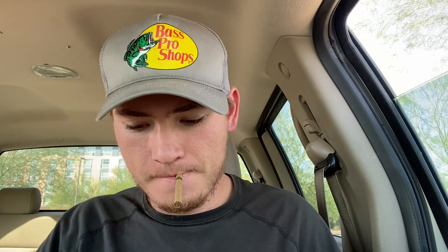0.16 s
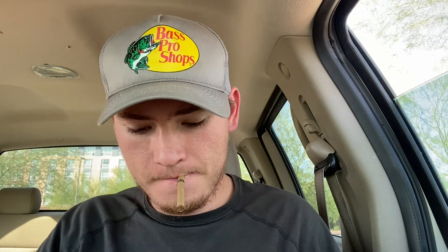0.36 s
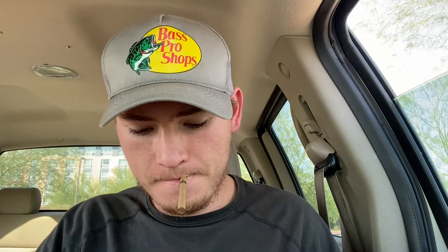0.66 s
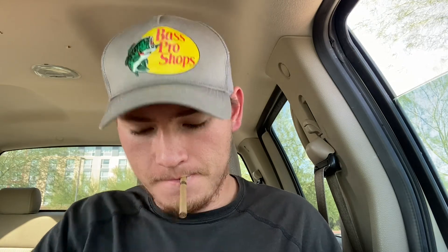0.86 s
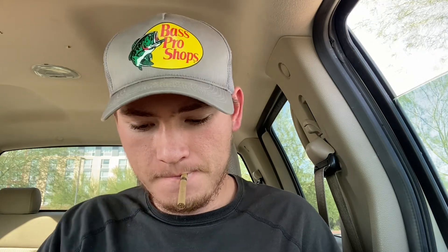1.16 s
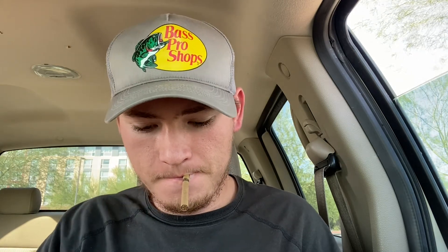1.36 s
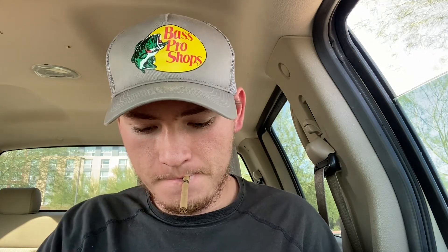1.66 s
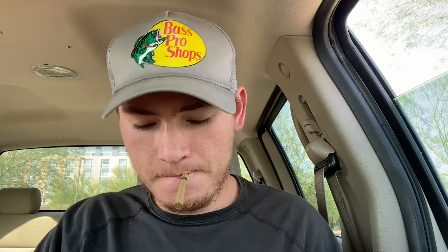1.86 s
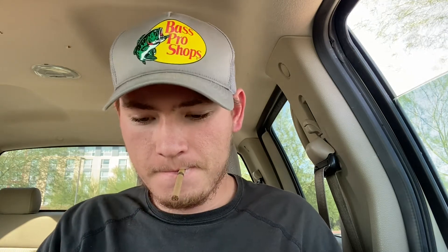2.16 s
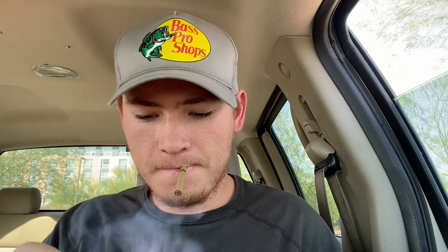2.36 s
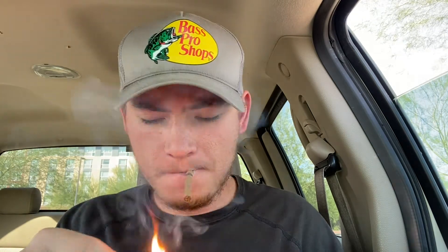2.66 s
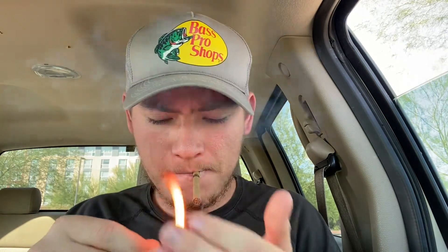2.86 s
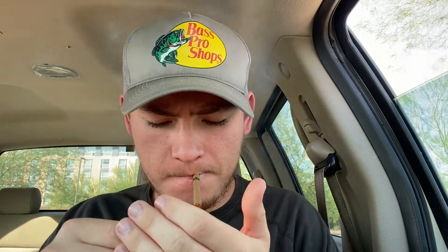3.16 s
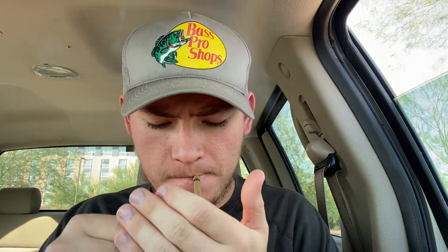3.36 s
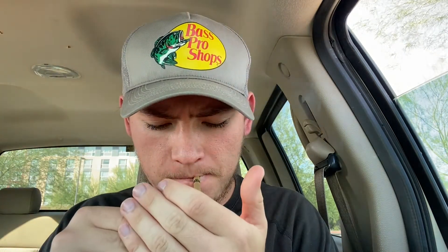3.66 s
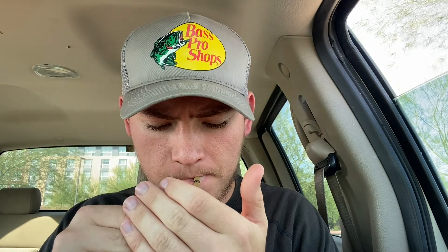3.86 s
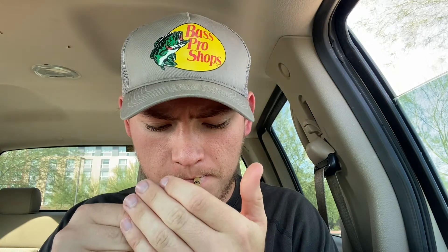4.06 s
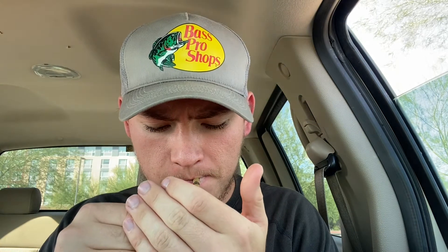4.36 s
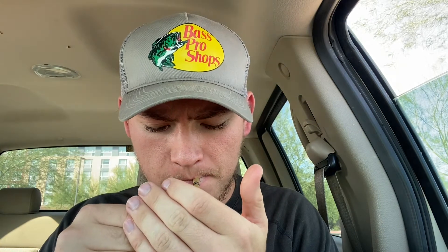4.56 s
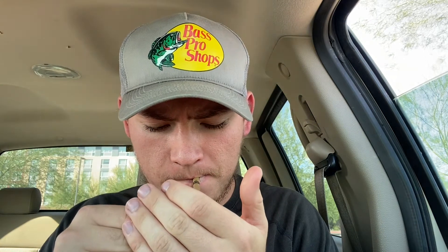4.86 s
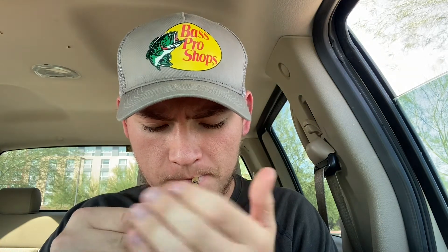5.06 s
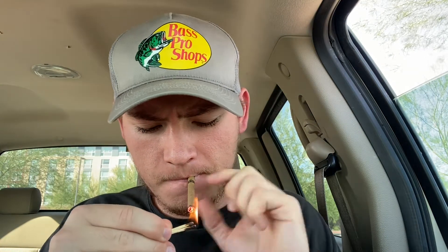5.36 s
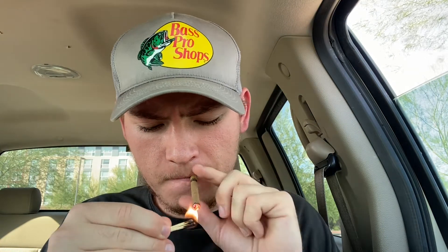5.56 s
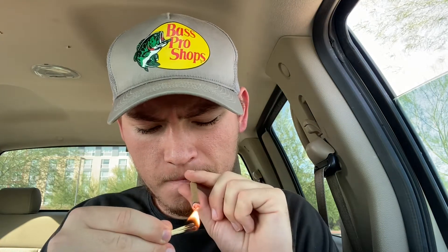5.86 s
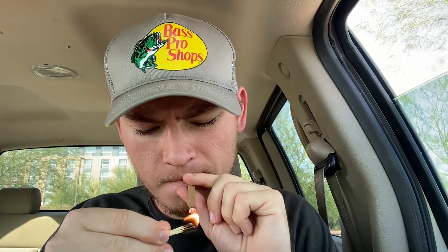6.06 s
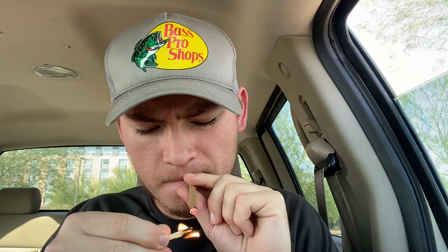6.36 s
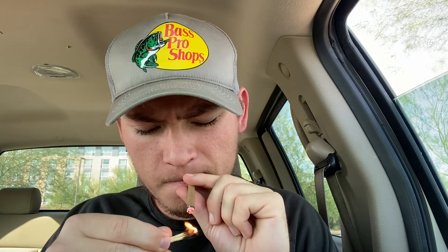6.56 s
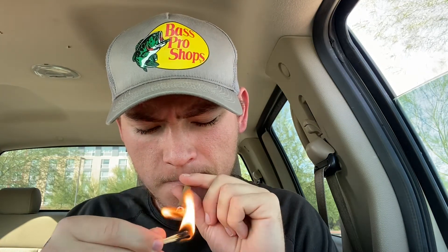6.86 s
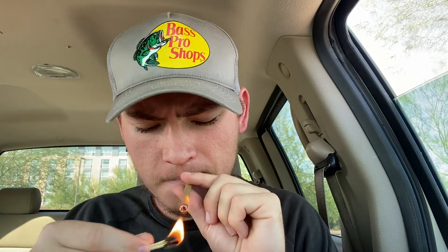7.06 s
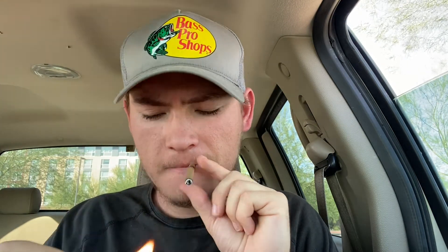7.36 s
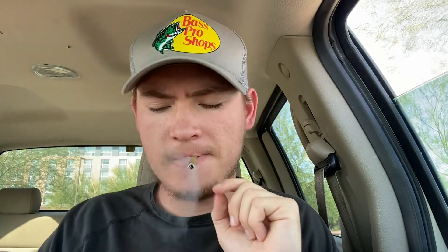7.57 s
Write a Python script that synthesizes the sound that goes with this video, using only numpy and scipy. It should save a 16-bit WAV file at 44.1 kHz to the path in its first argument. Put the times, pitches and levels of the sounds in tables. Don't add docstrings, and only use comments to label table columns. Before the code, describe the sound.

Close inside a parked car, fingers rub and tap a hollow cardboard matchbox over dull traffic rumble. A short scratchy strike fails, then a second, louder drag lights the match, followed by a soft airy hiss and more box taps. Afterwards only sparse tiny ticks of burning wood and faint sleeve rustle remain.

```python
import sys
import numpy as np
from scipy import signal
from scipy.fft import rfft, irfft, next_fast_len
from scipy.io import wavfile
from scipy.ndimage import uniform_filter1d

SR = 44100
rng = np.random.default_rng(int(sys.argv[2]) if len(sys.argv) > 2 else 0)


def master_out(mix):
    frames = np.transpose(np.atleast_2d(mix))
    ceiling = np.clip(frames, -1, 1)
    pcm = np.round(ceiling * 32767).astype(np.int16)
    wavfile.write(sys.argv[1], SR, pcm)


def field_ratio(decibels):
    return 10 ** (np.asarray(decibels, dtype=float) / 20)


N = 340313


def evened(x):
    return x / np.sqrt(np.mean(x ** 2) + 1e-20)


def read(points, hz):
    f, value = np.transpose(points)
    return np.interp(np.log(hz + 1), np.log(f + 1), value)


def smooth_patches(noise, bins, frames):
    over_hz = uniform_filter1d(noise, size=bins, axis=0)
    return evened(uniform_filter1d(over_hz, size=frames, axis=1))


def colour(x, points):
    gain = field_ratio(read(points, np.fft.rfftfreq(len(x), 1 / SR)))
    return irfft(rfft(x) * evened(gain), len(x))


def resonate(x, hz, width):
    r = np.exp(-np.pi * width / SR)
    pole = r * np.exp(2j * np.pi * hz / SR)
    return 2 * signal.lfilter([1 - r], [1, -pole], x + 1e-18).real


def add(mix, s, sound):
    part = mix[round(s * SR):][:len(sound)]
    part += sound[:len(part)]


def swell(rise_ms, fall_ms):
    ms = np.arange(4000) * 1000 / SR
    rise = max(rise_ms, .1)
    release = np.exp(-np.maximum(ms - rise, 0) / max(fall_ms, .2))
    return np.minimum(ms / rise, 1) ** 2 * release


def sandpaper(rough_db):
    size = np.minimum(rng.exponential(1, N), 5)
    return evened(rng.standard_normal(N) * field_ratio(rough_db * size))


# time_s, level_db
ROAR_LEVEL = [(0, 5.5), (.6, 6.5), (1.3, 8.5), (2.1, 5.5), (2.35, 12.5), (2.64, 6), (2.75, 2), (3.0, 3),
              (3.2, 3), (3.55, 1.5), (4.25, 0.5), (4.8, 2), (5.2, 0.4), (5.7, 2.5), (6.35, 2), (6.55, 3.5),
              (7.4, 4), (7.72, 6)]
# centre_s, lift_db, fade_db_per_s
SLEEVE_RUSTLES = [(.2, 8.5, 1.5), (.86, 24.5, 89.5), (1.0, 16.5, 110), (1.62, 11, 30), (2.9, 9, 10),
                  (5.38, 9, 9), (6.4, 5.5, 5.5), (7.5, 6, 5)]
# centre_s, half_length_s, centre_hz, half_width_hz,
# level_db
BAND_SWELLS = [(1.36, .3, 3750, 800, 8), (6.12, .24, 3750, 200, 6), (1.95, .25, 300, 300, 3),
               (.5, .9, 950, 200, 2), (6.6, 1.3, 930, 170, 2.5), (4, 1.6, 720, 60, -4),
               (1.33, .27, 3000, 1800, -5), (6.45, .35, 3500, 1500, 2)]
# frequency_hz, level_db_per_hz
SHELL_SPECTRUM = [(15, -45), (30, -19), (64, 0.5), (107, -14), (185, -9), (232, -18.5), (374, -29.5),
                  (650, -32), (944, -25), (1300, -27.5), (2730, -45), (3300, -49), (5500, -63),
                  (15800, -80)]
# frequency_hz, likeness_0_to_1
FAR_COHERENCE = [(60, 0.93), (130, 0.99), (290, 0.2), (700, 0.01), (1200, 0.69), (2200, .25), (4400, 0.1),
                 (6000, 0.8), (6700, .8), (7800, 0.99)]
# frequency_hz, lead_rad
FAR_PHASE = [(0, 0), (1400, -3.1), (2800, -7.3), (3500, -11), (4500, -15.4), (5800, -15.6), (6300, -14.4),
             (7900, -12.57), (13000, -6.28), (16000, -2.6)]
# frequency_hz, left_minus_right_db
PORT_BALANCE = [(60, 0), (800, -4.5), (1800, 0), (3000, 1), (4200, -2), (5800, -3.5), (7600, -1),
                (15000, -0.5)]


def cabin():
    region_hz = [200, 800, 2800, 6500]
    by_traffic, by_cloth = [.12, 0.91, .6, .01], [.05, .01, 0.24, 1.1]
    at_rest_db = [-0.75, -0.1, -2, -1.5]
    duck_s, duck_db, duck_back_s = 1.76, -6, 0.401
    frames, hz = N // 512 + 5, np.fft.rfftfreq(2048, 1 / SR)
    t = np.arange(frames) * 512 / SR

    cloth = np.max([np.maximum(db - fade * abs(t - s), 0) for s, db, fade in SLEEVE_RUSTLES], axis=0)
    traffic = np.interp(t, *np.transpose(ROAR_LEVEL))
    drift = np.outer(by_traffic, traffic) + np.outer(by_cloth, cloth) + np.c_[at_rest_db]
    since_duck = np.maximum(t - duck_s, 0)
    drift[0] += duck_db * (t > duck_s) * np.exp(-(since_duck / duck_back_s) ** 2)
    shares = np.array([read(list(zip(region_hz, row)), hz) for row in np.eye(4)])

    a, b, c, d, patches = rng.standard_normal((frames, len(hz), 5)).T
    patches = smooth_patches(patches, bins=5, frames=10)
    left, unlike = a + 1j * b, c + 1j * d
    like = np.clip(read(FAR_COHERENCE, hz), 0, 1)[:, None]
    lag = np.exp(-1j * np.interp(hz, *np.transpose(FAR_PHASE)))[:, None]
    z = np.array([left, lag * (like * left + np.sqrt(1 - like ** 2) * unlike)])
    patch_db = 2.2 * np.minimum(hz / 150, 1)[:, None] * patches
    z *= field_ratio(read(SHELL_SPECTRUM, hz)[:, None] + patch_db)
    scale = np.sqrt(np.mean(signal.istft(z[0], nperseg=2048, noverlap=1536)[1] ** 2))

    lift_db = 0
    for s, span, mid_hz, width, db in BAND_SWELLS:
        lift_db = lift_db + db * np.exp(-((t - s) / span) ** 4 - ((hz[:, None] - mid_hz) / width) ** 4)
    pan_db = read(PORT_BALANCE, hz)[:, None] / 2
    z *= field_ratio(shares.T @ drift + lift_db) * np.array([field_ratio(pan_db), field_ratio(-pan_db)])
    return field_ratio(-34.5 - 0.68) / scale * signal.istft(z, nperseg=2048, noverlap=1536)[1][:, :N]


# start_s, level_db, top_end_db
FINGER_RUBS = [(.15, -56, -12), (.2414, -51, -17), (.2583, -45, -26), (.271, -44, -20),
               (0.2802, -32.5, -27.5), (.305, -39.5, -18), (.3102, -44.5, -18), (0.5662, -40.5, -8),
               (0.614, -31, -4.5), (.621, -38.5, -12), (0.6898, -50, -22), (.838, -40, -19),
               (0.8588, -32, -13.5), (.8667, -40, -12.5), (.8804, -39, -9.5), (0.9621, -32.5, -11.5),
               (1.012, -42, -8), (1.064, -50.5, -19), (1.8717, -39, -9), (1.8967, -43, -8),
               (1.9492, -38, -10), (2.2641, -38.5, -9), (2.2706, -30, -13), (2.2887, -27.5, -10.5),
               (2.403, -33.5, -5), (2.414, -27.5, -12.5), (2.4184, -32, -15.5), (2.5943, -38, -9)]
# start_s, level_db, top_end_db, rise_ms
SLOW_SCUFFS = [(.018, -41.5, -15, 2.1), (0.0337, -38, -10.5, 2), (0.9515, -37.5, -14.5, 1.8),
               (.972, -34, -18.5, 2.6), (1.6281, -39.5, -17.5, 2.1), (1.63, -46.5, -11, 10),
               (2.4304, -29, -18, 2.1), (5.2, -58, -2.5, 28), (5.87, -62, -4, 16), (6.04, -65.5, -2.2, 12),
               (6.34, -64.5, 0, 23)]
# start_s, level_db
GRAIN_SNAPS = [(0.7777, -10.5), (.7968, -20.5), (.8125, -24), (2.2716, -25.5), (2.4155, -27.5),
               (2.4214, -30.5)]
# time_s, level_db
STRIKE_PRESSURE = [
    [(.738, -62), (.756, -56.5), (.759, -41.5), (.77, -35), (.779, -24), (.788, -30.5), (.797, -22.5),
     (.813, -33), (.836, -50)],
    [(1.694, -62.5), (1.697, -46.5), (1.705, -48.5), (1.722, -32), (1.736, -21.5), (1.744, -10.5),
     (1.754, -20.5), (1.763, -35.5), (1.795, -60)],
]
# frequency_hz, level_db_per_hz
GRIT_SPECTRUM = [(150, -10.5), (400, -29), (1500, -2), (2600, 0), (3400, -7), (4600, -1), (5600, -5.5),
                 (7000, -5.5)]
# frequency_hz, level_db_per_hz
SPARKLE_SPECTRUM = [(5500, -39), (7000, -4), (8600, 3), (10400, 0), (12000, 1), (14000, -8), (15800, -9.5)]


def rasping():
    strike_db, strike_top_db = 3, [-7.5, -2]
    grains, dull, bright = sandpaper(rough_db=-1.26), np.zeros(N), np.zeros(N)
    # start_s, level_db, top_end_db, rise_ms, fall_ms
    touches = [(*rub, 1.8, 4.3) for rub in FINGER_RUBS]
    touches += [(*scuff, 10.5) for scuff in SLOW_SCUFFS]
    touches += [(*snap, -1.1, .4, .75) for snap in GRAIN_SNAPS]
    pushes = []
    for s, db, top_db, rise_ms, fall_ms in touches:
        pushes.append((s, field_ratio(db - 2.5) * swell(rise_ms, fall_ms), top_db))
    for rows, top_db in zip(STRIKE_PRESSURE, strike_top_db):
        s, db = np.transpose(rows)
        level_db = strike_db + np.interp(np.arange(s[0], s[-1], 1 / SR), s, db)
        pushes.append((s[0], field_ratio(level_db), top_db))
    for s, pressure, top_db in pushes:
        push = pressure * grains[round(s * SR):][:len(pressure)]
        add(bright, s, field_ratio(top_db) * push)
        add(dull, s, np.sqrt(max(1 - field_ratio(top_db) ** 2, .1)) * push)
    return 1.145 * colour(dull, GRIT_SPECTRUM + [(8500, -37.5)]) + colour(bright, SPARKLE_SPECTRUM)


# start_s, level_db, pitch_hz
FINGER_KNOCKS = [(.021, -36.5, 970), (.04, -28, 1355), (.242, -36.5, 2010), (.258, -29, 1847),
                 (.282, -24, 1800), (.615, -29, 746), (.837, -31, 1930), (.858, -24, 2095),
                 (.867, -33, 1970), (.879, -33.5, 940), (.958, -33, 1933), (.971, -33.5, 1168),
                 (1.014, -37, 1930), (1.064, -37, 1900), (1.873, -31.5, 790), (1.948, -31.5, 2110),
                 (2.152, -29.5, 1310), (2.184, -36, 770), (2.265, -31, 2292), (2.273, -29, 1900),
                 (2.289, -27, 1758), (2.401, -30, 2340), (2.41, -22, 1855), (2.422, -19, 1657),
                 (2.433, -26.5, 1245), (3.448, -39, 922), (6.478, -40.5, 908)]
# start_s, level_db, pitch_hz
HEAD_CATCHES = [(.758, -22, 2154), (.762, -20, 2100), (.768, -13, 2152), (0.777, -10, 1930),
                (.784, -19, 2000), (.793, -11, 1900), (.803, -24.5, 900), (.812, -25.5, 1900),
                (.82, -30, 2210), (1.708, -29, 2048), (1.714, -23.5, 1901), (1.721, -14.5, 1943),
                (1.725, -9.5, 1947), (1.731, -8, 1900), (1.733, -14.5, 1220), (1.738, -8, 1838),
                (1.742, -3, 1746), (1.752, -22, 1996), (1.766, -25, 1906), (1.774, -29.5, 1892)]
# start_s, level_db, pitch_hz
BOX_THUMPS = [(.794, -31.5, 400), (.794, -16, 1150), (.795, -24.5, 700), (1.74, -20.5, 169.8),
              (1.742, -22.5, 751.5), (1.742, -16.5, 1230)]
# pitch_hz, width_hz, level_db
WALL_MODES = [(790, 120, -11), (1240, 200, -20), (2140, 220, -10.5), (2643, 70, -3), (4517, 80, -18.5)]


def box():
    t, out, jolt = np.arange(4000) / SR, np.zeros(N), np.zeros(N)
    # start_s, level_db, pitch_hz, rise_ms, fall_ms
    blows = [(*knock, 1.6, 1.9) for knock in FINGER_KNOCKS]
    blows += [(*catch, 2.8, 3.2) for catch in HEAD_CATCHES]
    blows += [(*thump, 3.6, 3.7) for thump in BOX_THUMPS]
    noises = rng.standard_normal((len(blows), 4000))
    for (s, db, hz, rise_ms, fall_ms), noise in zip(blows, noises):
        shape = field_ratio(db) * swell(rise_ms, fall_ms)
        shaky = 0.58 * min(hz / 1500, 1) * evened(uniform_filter1d(noise, 60))
        add(out, s, 1.2 * shape * np.sin(2 * np.pi * hz * t + shaky))
        add(jolt, s, 2.7 * shape * noise)
    return out + sum(field_ratio(db) * resonate(jolt, hz, width) for hz, width, db in WALL_MODES)


# time_s, level_db
FLARE_LEVEL = [(1.8, -60), (1.89, -47), (2.0, -49), (2.12, -53), (2.18, -47.5), (2.33, -42.5), (2.6, -44.5),
               (2.725, -47), (2.742, -58)]
# frequency_hz, level_db_per_hz
GAS_SPECTRUM = [(500, -24.5), (900, -6), (2700, -5.5), (4200, -9.5), (5500, -14), (7800, -12),
                (10400, -16.5), (12800, -15.5), (14500, -23), (15800, -30)]


def flare():
    dies_db_per_s = 94
    s, db = np.transpose(FLARE_LEVEL)
    flutter = evened(uniform_filter1d(rng.standard_normal(N), 500))
    _, _, z = signal.stft(sandpaper(rough_db=1.4), nperseg=512)
    patches = smooth_patches(rng.standard_normal(z.shape), bins=6, frames=9)
    jets = evened(signal.istft(z * field_ratio(1.7 * patches), nperseg=512)[1][:N])
    t = np.arange(N) / SR
    level_db = np.interp(t, s, db, left=-120) - dies_db_per_s * np.maximum(t - s[-1], 0)
    return colour(field_ratio(level_db + 0.94 * flutter) * jets, GAS_SPECTRUM)


# start_s, level_db
FIBRE_TICKS = [(2.7985, -45.5), (2.8444, -51), (2.8948, -52), (3.0394, -57), (3.1033, -47), (3.1637, -41.5),
               (3.5039, -51.5), (3.7633, -54.5), (3.9094, -59.5), (4.1325, -49), (4.6064, -47),
               (5.3038, -42.5), (5.9334, -35), (6.102, -52), (6.8079, -56.5), (7.0524, -56),
               (7.5243, -42.5)]
# frequency_hz, level_db_per_hz
CLICK_SPECTRUM = [(3000, -24.5), (5800, -10), (7500, 1), (10400, -4), (13000, -9), (15800, -9.5)]
# frequency_hz, level_db_per_hz
STICK_SPECTRUM = [(600, -24.5), (1300, -3), (2300, 3), (3200, -7), (4300, -2), (5800, -13), (8000, -29.5)]


def ticks():
    body_db = -0.9
    out, body = np.zeros(N), np.zeros(N)
    fizz = .4 * swell(.15, 0.28) + 0.14 * swell(.5, 2.4) + .05 * swell(1.5, 11)
    for (s, db), noise in zip(FIBRE_TICKS, rng.standard_normal((len(FIBRE_TICKS), 4000))):
        snap = field_ratio(db + 2.5) * (2.2 * signal.unit_impulse(4000, 5) + noise * fizz)
        add(out, s, snap)
        add(body, s, field_ratio(body_db) * snap)
    return colour(out, CLICK_SPECTRUM) + colour(body, STICK_SPECTRUM)


# frequency_hz, likeness_0_to_1
NEAR_COHERENCE = [(300, 1), (1000, 0.73), (2000, 0.877), (3400, 0.56), (4500, 0.17), (6000, 0.22),
                  (6700, 0.49), (7800, 0.93), (10400, 0.96)]
# frequency_hz, lead_rad
NEAR_PHASE = [(0, -3), (700, -0.15), (2300, -1), (3500, -3), (5800, -1), (6300, 0.04), (7900, 0),
              (13000, 6.5), (16000, 9.5)]


def ports(x):
    decay_s = 0.043
    size = next_fast_len(N + 4000)
    hz = np.fft.rfftfreq(size, 1 / SR)
    half = field_ratio(read(PORT_BALANCE, hz) / 2) * np.exp(.5j * np.interp(hz, *np.transpose(NEAR_PHASE)))
    taps = rng.standard_normal((3, 2, 4000)) * (rng.random((3, 2, 4000)) < .15)
    taps *= field_ratio(-60 * np.arange(4000) / SR / decay_s)
    tails = rfft(taps / np.linalg.norm(taps, axis=2, keepdims=True), size)
    cycle = 11 * np.arange(N) / SR + np.arange(3)[:, None] / 3
    turns = np.cos(2 * np.pi * cycle) * np.sqrt(2 / 3)
    echoes = (rfft(x * turns, size)[:, None] * tails).sum(0)
    like = np.clip(read(NEAR_COHERENCE, hz), 0, 1)
    direct = np.sqrt(like) * rfft(x, size)
    heard = np.array([half, 1 / half]) * (direct + np.sqrt(1 - like) * echoes)
    return irfft(heard, size)[:, :N]


def scene():
    far = cabin()
    return far + ports(rasping() + box() + flare() + ticks())


def low_pass(x):
    return signal.sosfilt(signal.butter(12, 15900, fs=SR, output="sos"), x)


def record(dry):
    mid_side = np.array([dry[0] + dry[1], dry[0] - dry[1]]) / 2
    mid_side = np.pad(mid_side, ((0, 0), (0, 2048)), "reflect")
    hz, _, z = signal.stft(mid_side, SR, nperseg=1024, noverlap=768, boundary="even")
    power = uniform_filter1d(uniform_filter1d(abs(z) ** 2, size=9, axis=1), size=3, axis=2)
    band_db = 10 * np.log10(power + 1e-20)
    other_db = band_db[::-1]
    margin_db = np.clip(5.5 + 0.1 * (other_db + 101), 3.0, 15.0)
    masked = (band_db < other_db - margin_db) & (hz[:, None] > 6500)
    dropped = masked | (hz[:, None] > 15900)
    mid, side = signal.istft(z * np.where(dropped, .01, 1), SR, nperseg=1024, noverlap=768)[1][:, :N]
    return low_pass(np.clip([mid + side, mid - side], -1, 1))


dry = scene()
out = record(dry)
master_out(out)
```